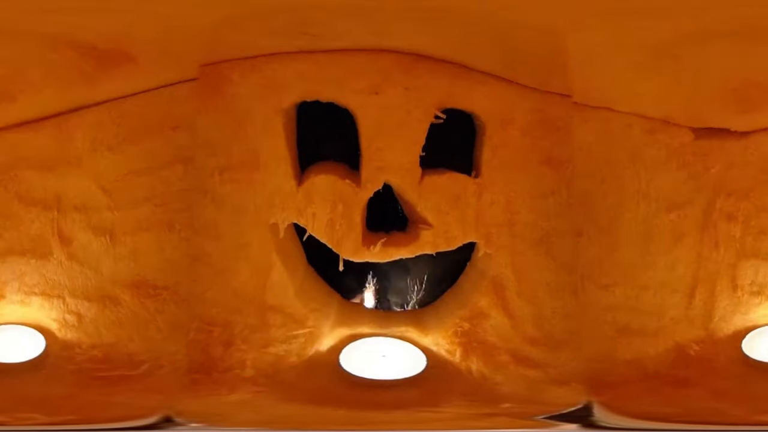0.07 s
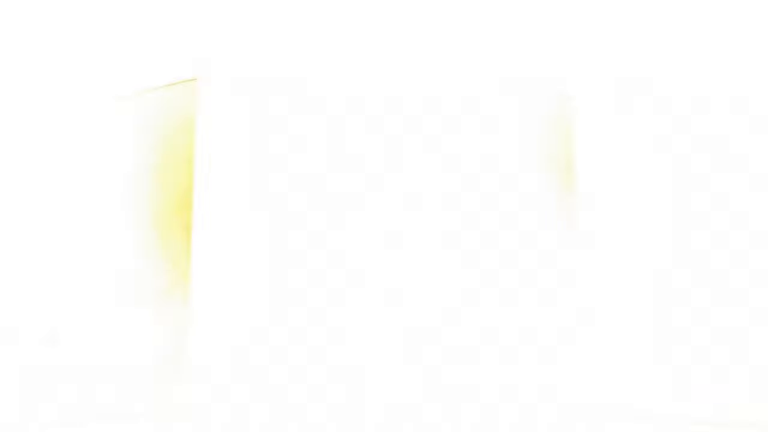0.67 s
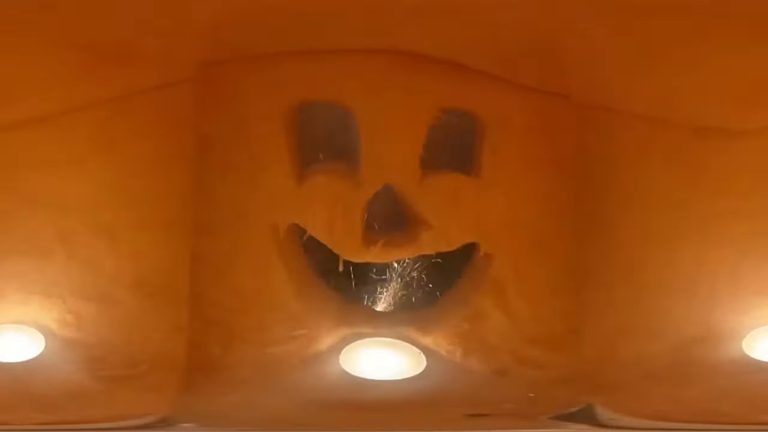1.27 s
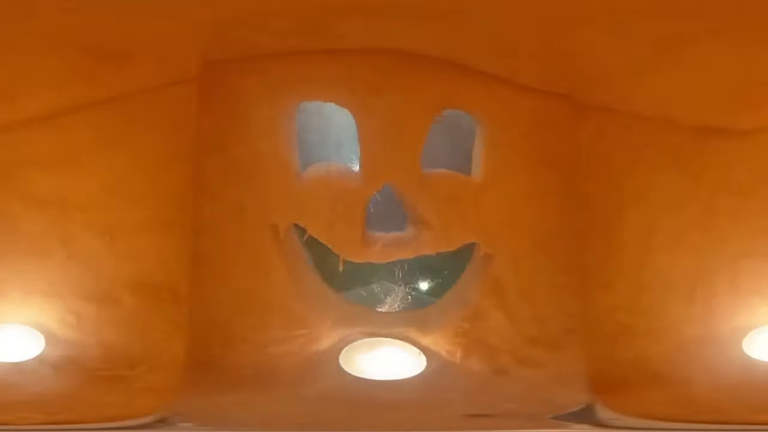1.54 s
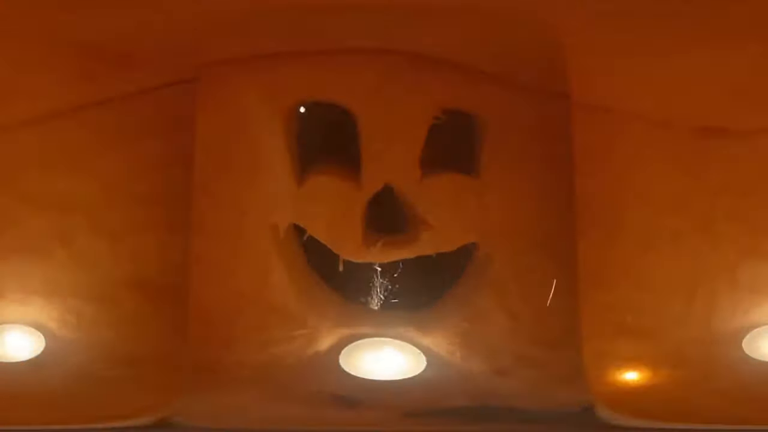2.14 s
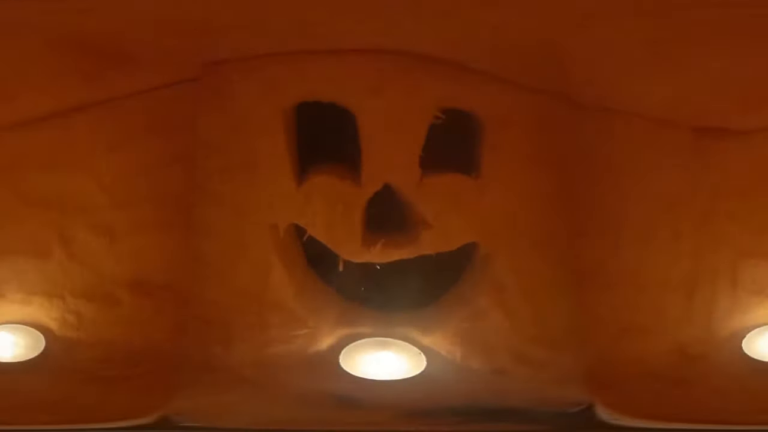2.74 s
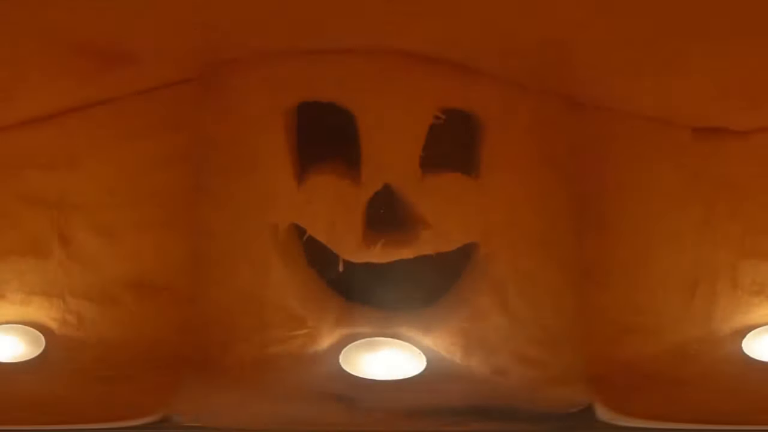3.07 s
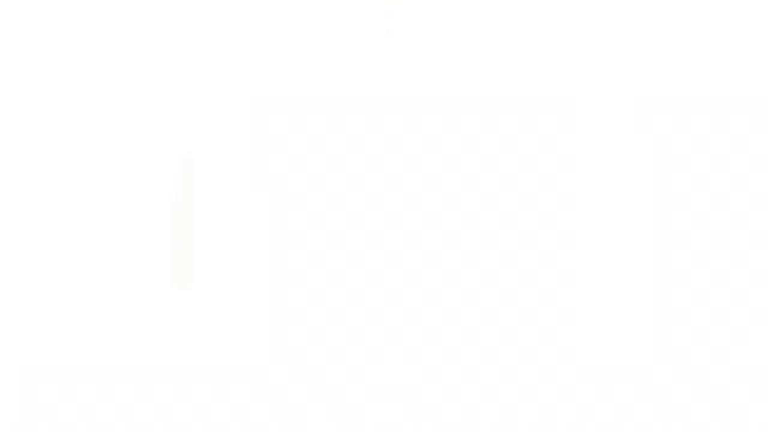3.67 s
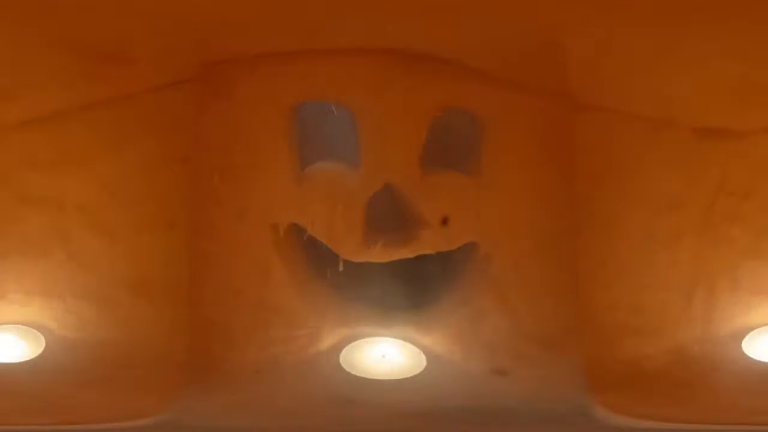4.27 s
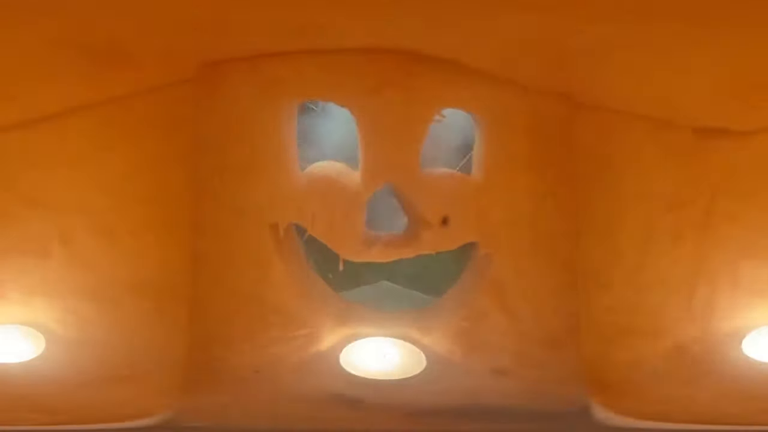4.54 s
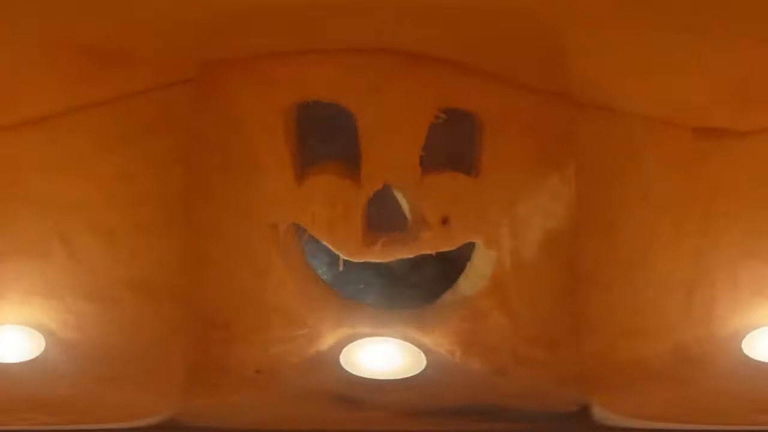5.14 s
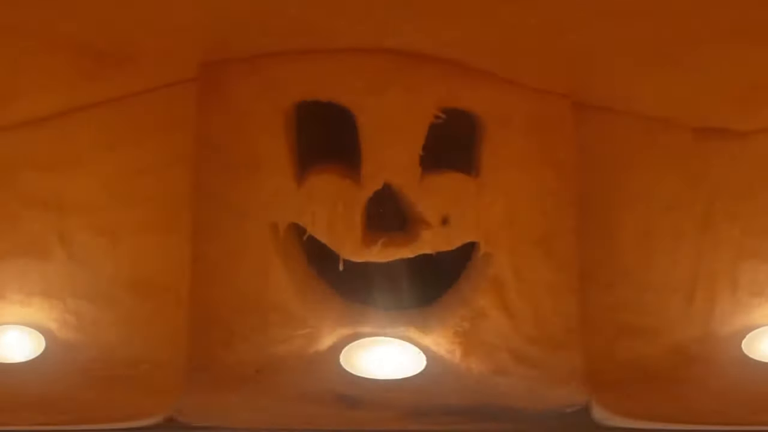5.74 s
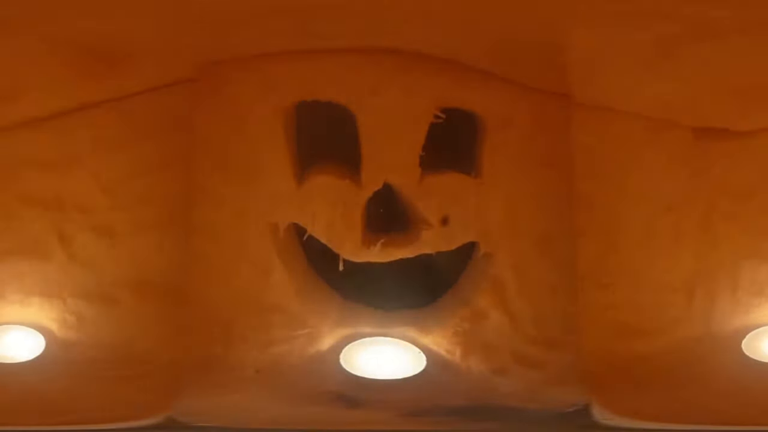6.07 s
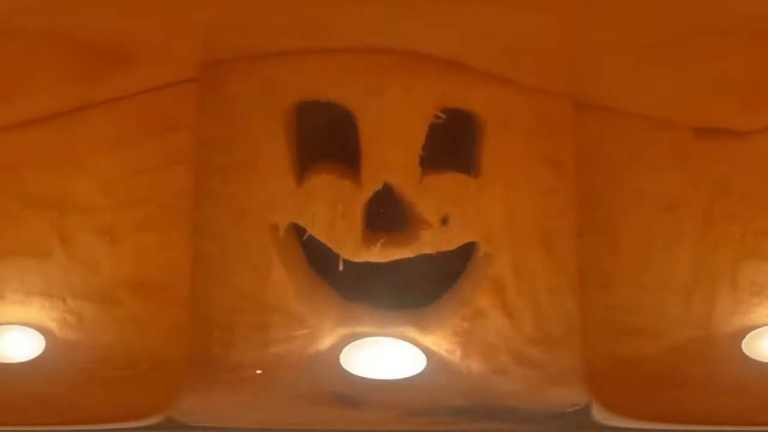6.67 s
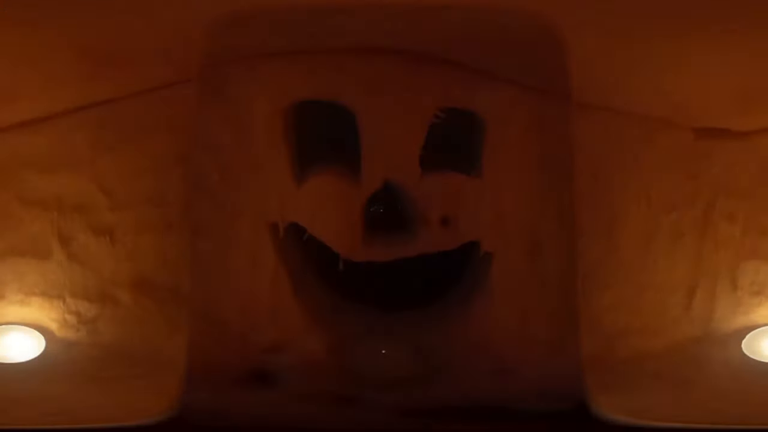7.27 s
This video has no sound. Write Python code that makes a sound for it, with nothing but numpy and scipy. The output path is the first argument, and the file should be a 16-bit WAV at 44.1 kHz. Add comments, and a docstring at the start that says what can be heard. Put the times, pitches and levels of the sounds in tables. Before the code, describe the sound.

Firecrackers go off in two rapid, crackling bursts with hollow thumps and faint fuse hiss, heard from inside a carved pumpkin.

```python
"""A faint fuse hisses, powder flares with a thump, and firecrackers go off at a hollow carved pumpkin.
Twice, single bangs thicken into a crackle and thin out again; fuses hiss between, and a last thump ends it.
Each bang is a sharp jump in air pressure that flutters between the pumpkin's walls, while flaring
powder makes the hollow ring like a bottle. The microphones sit inside, and loud bangs overload them."""
import sys
import numpy as np
from scipy import signal
from scipy.fft import rfft, irfft, next_fast_len
from scipy.io import wavfile
from scipy.ndimage import map_coordinates

SR = 44100
rng = np.random.default_rng(int(sys.argv[2]) if len(sys.argv) > 2 else 0)


def wav_out(sig):
    """Save sig, one row per channel (or a flat mono array), as 16-bit PCM at SR to the path in sys.argv[1]."""
    wavfile.write(sys.argv[1], SR, np.round(np.clip(np.atleast_2d(sig).T, -1, 1) * 32767).astype(np.int16))


N = 326781

# flaring powder: (time [s], push [dB], hollow's pitch [Hz], hollow's ring time [s], knock [dB],
# knock pitch [Hz], shell [dB], rush [dB], rush rise [s], rush fall [s])
# Ring, rise and fall times, and names with "t60", give the time for a change of 60 dB.
FLARES = [(.5130, -3, 284, 0.02, -1, 375, -9.5, -29.5, 0.034, 0.33),
          (0.5744, -3, 264, 0.013, -15, 440, -34, -13, 0.04, 0.03),
          (3.5457, -3, 253, 0.022, 1, 501, -9.5, -27, 0.057, 0.14),
          (3.5718, 3, 224, 0.02, 3, 720, -22, -4.5, 0.0053, 0.016),
          (1.8300, -9, 270, 0.061, -27, 495, -24.5, -46, .005, .05),
          (6.7114, -3.5, 268.7, 0.059, -36, 1115, -4.5, -50, 0.0026, 0.15)]


def bangs(flutter_db=-5, strong_db=-17.5, flutter_growth=0.68):
    """List the single bangs for pops(): loud bangs overload the microphones and ring on longer."""
    # bangs that stand out: (time [s], level [dB], bass [dB], treble [dB], pitch [Hz])
    single_bangs = [(0.6596, -34, 1.5, 16, 2408), (0.7526, -38.5, 5, -2, 978),
                    (0.811, -8.5, -0.5, -2.5, 1019), (.8243, -19.5, -9.5, -7.5, 1613),
                    (0.8547, -30.5, -2, 8, 749), (0.8949, -4.5, -7.5, -2, 1867),
                    (0.9194, -24, -3.5, 6.5, 2690), (0.9584, -20.5, -1.5, 3, 2813),
                    (0.9697, -6.5, -9, -4, 1855), (0.9803, -16.5, -3.5, 2, 1740),
                    (1.0175, -19, -4.5, 3.5, 3060), (1.0293, -17.5, -4, 2, 3075),
                    (1.0443, -20.5, -4, 8.5, 2914), (1.057, -24, -2.5, 4, 1507),
                    (1.0651, -6.5, -2.5, 2.5, 2980), (1.0692, -10.5, -3, 2.5, 1003),
                    (1.081, -14, 1.5, 3.5, 2100), (1.1042, -8.5, -2.5, 0, 2788),
                    (1.1299, -18.5, 2, 13.5, 1019), (1.1373, -18, 0.5, 9, 3002),
                    (1.1786, -18.5, -4, 6, 3118), (1.1922, -15.5, 0.5, 1, 800),
                    (1.2145, -14, 1.5, 8.5, 2397), (1.2347, -14, -4, 4, 786), (1.298, -12.5, -4, 10, 3207),
                    (1.3185, -12.5, -5, 11.5, 1440), (1.3838, -8.5, -0.5, 8, 3890),
                    (1.4023, -7.5, 2, 9, 4840), (1.4204, -11.5, 11.5, 2, 360), (1.4376, -8, 4.5, 6.5, 992),
                    (1.4605, -8.5, -5, 7, 1985), (1.4921, -12.5, 1, 4.5, 952), (1.51, -15.5, 3.5, 0.5, 817),
                    (1.5592, -4.5, 8, 4, 960), (1.5956, -8, -3, 7.5, 984), (1.6203, -7, 5.5, 4, 570),
                    (1.6659, -6.5, 2.5, 7, 1285), (1.705, -14.5, 7, 4.5, 372.7),
                    (1.745, -17.5, -1.5, 4, 1022), (1.7611, -10, 3.5, 10, 2540),
                    (1.7714, -10.5, 6.5, 6.5, 2740), (1.799, -12.5, -5.5, 6.5, 1004),
                    (1.8046, -11.5, 3.5, 9.5, 982), (1.8158, -9, -0.5, 4, 758),
                    (1.8276, -11, -1.5, 2.5, 710), (1.8449, -15.5, -0.5, 0.5, 1185),
                    (1.8790, -7, 5, 5.5, 2150), (1.8953, -19, -4, 0, 1953), (1.9235, -17, -0.5, 6.5, 1814),
                    (1.9383, -15, 3, 11, 1430), (1.976, -14, 2, 7, 366), (2.067, -16, 9, 15.5, 1773),
                    (2.08, -23, -7, 0, 2920), (2.0946, -13.5, 0, 4, 824), (2.1091, -25, -14, -10.5, 1740),
                    (2.1505, -21.5, -6, 6, 1073), (2.1629, -21.5, 4.5, -3.5, 734), (2.262, -13, -4, 2, 782),
                    (2.2777, -25, -9, 9.5, 1690), (2.8777, -18.5, 0, 1.5, 1160),
                    (3.7285, -7, -5, -0.5, 1588), (3.7745, -31, -8, -11, 1740), (3.8258, -27, -5, 4, 2000),
                    (3.8277, -8.5, -2, 5.5, 2797), (3.8712, -30.5, -1.5, -11.5, 986),
                    (3.9395, -32, -2, 5.5, 888), (3.9509, -7, 3, -6, 788), (3.9764, -26, 3, 11.5, 2280),
                    (4.047, -27, -7, 10, 957), (4.0593, -24.5, -3.5, 2.5, 3154), (4.07, -24, -4, 4.5, 940),
                    (4.106, -23.5, -5.5, 1, 966), (4.1193, -18.5, -2, 7, 710), (4.1317, -27.5, -5, 9, 950),
                    (4.1431, -6.5, 2, 2, 835), (4.1499, -7.5, -6, -3.5, 845), (4.1595, -21, -4, 3, 2405),
                    (4.1901, -17, -5.5, 11, 2902), (4.2044, -18, -2, 5.5, 788.5),
                    (4.2204, -22.5, 1.5, 7, 2900), (4.2262, -8.5, 7.5, 7.5, 3130),
                    (4.2526, -14, 0.5, 3, 790), (4.26, -10, -0.5, 2.5, 2678), (4.2842, -12, -5, 7.5, 1340),
                    (4.2949, -11.5, 4, 3.5, 370), (4.3453, -12.5, 6, 6, 2250), (4.3564, -8, 11, 8, 934),
                    (4.4046, -10.5, 4, -0.5, 687), (4.4332, -11, 2, 2.5, 4880),
                    (4.464, -3.5, 5.5, 7.5, 3146), (4.492, -6.5, 0, 5.5, 952), (4.5144, -12.5, -2, -4, 770),
                    (4.549, -5.5, 9.5, 2, 853), (4.5717, -14.5, -0.5, 6.5, 680),
                    (4.5844, -7.5, 7.5, 8, 1725), (4.6318, -16, 4.5, 4, 2500), (4.6463, -7, 7, 7, 970),
                    (4.669, -6.5, 9.5, 8, 970), (4.7104, -3, 12.5, 11, 765), (4.7239, -6, 6, 10, 380),
                    (4.7305, -8.5, 7, 10.5, 1220), (4.7489, -11.5, 4.5, 6, 370),
                    (4.7793, -15.5, 1, 6, 1960), (4.7953, -13.5, -0.5, 6, 2990),
                    (4.8365, -14, 5, 5.5, 2250), (4.8557, -25, 4, 8, 610), (4.8648, -13, -6, -6, 897),
                    (4.8886, -13.5, 3.5, 12, 1580), (5.1261, -14.5, 5.5, 2.5, 1270),
                    (5.3053, -20, -0.5, -6, 1195), (5.414, -18, 0.5, 3.5, 3700), (5.434, -23, 7, -5.5, 684)]
    when, db, bass_db, treble_db, hz = np.transpose(single_bangs)
    flutter = flutter_db + flutter_growth * np.maximum(db - strong_db, 0)
    return np.c_[when, db, bass_db, treble_db, flutter, hz]


def crackle(scatter_db=3.5, bass_scatter_db=3.0, treble_db=6.5, treble_scatter_db=2.5, flutter_db=-3.5,
            pitch_hz=1600, spread_octaves=.8, uneven=.7, count=220, edge_pace=.25, edge_drop_db=5.5):
    """A string of crackers catches: its pops come faster and louder, hold their pace, then thin out."""
    # burning strings: (start [s], full pace from [s], full pace until [s], end [s],
    # level at full pace [dB], full pace [pops/s])
    volleys = [(1.09, 1.39, 1.50, 1.80, -17, 310), (4.22, 4.41, 4.55, 4.77, -14, 260)]
    rows = []
    for first, full, ebb, last, db, rate in volleys:
        t = np.arange(first, last, 1 / SR)
        heat = np.interp(t, [first, full, ebb, last], [0, 1, 1, 0])
        burnt = np.cumsum(rate * (edge_pace + (1 - edge_pace) * heat)) / SR  # crackers spent so far
        turn = np.abs(np.arange(count) + uneven * rng.standard_normal(count))
        size, depth, sharpness, pitch = np.clip(rng.standard_normal((count, 4)).T, -2, 2)
        when = np.interp(turn, burnt, t)
        level = db - edge_drop_db * (1 - np.interp(when, t, heat)) + scatter_db * size
        # the pops grow deeper as the string burns down
        bass = np.interp(when, [first, last], [-3.5, 2]) + bass_scatter_db * depth
        treble = treble_db + treble_scatter_db * sharpness
        hz = pitch_hz * 2 ** (spread_octaves * pitch)
        volley = np.c_[when, level, bass, treble, np.full(count, flutter_db), hz]
        rows.append(volley[turn < burnt[-1]])
    return pops(np.vstack(rows))


def pops(rows, flutter_t60=0.014, lag_s=.00014, pan_db=2, pitch_db=4.0, pitch_octaves=0.21,
         trapped_db=-1.0, size=1024):
    """Each pop is a shock wave with its own pitch, followed by its flutter between the pumpkin's walls."""
    # tone of a blast: (frequency [Hz], level [dB])
    blast = [(40, -21), (100, -23), (200, 0), (350, 1.5), (800, 0.5), (1400, -1), (2100, -2.5),
             (3000, -2.5), (5000, -9), (7500, -12), (11000, -22), (16000, -38.5)]
    # tones of the pumpkin's hollow: (pitch [Hz], width [Hz], boost [dB])
    cavity = [(268, 170, 0), (980, 290, 3), (2700, 450, -0.5)]
    when, db, bass_db, treble_db, flutter_db, pitch_hz = np.transpose(rows)[:, :, None, None]
    t, hz = np.arange(size) / SR, np.fft.rfftfreq(size, 1 / SR)
    lead = 16 / SR  # a little space ahead of the shock
    sides = np.array([[1], [-1]])
    lag, pan = rng.standard_normal((len(rows), 2)).T[:, :, None, None]
    # the crackers lie all about, so each shock meets the two microphones at different moments
    shock = np.exp(-2j * np.pi * hz * (lead + sides * lag_s / 2 * np.clip(lag, -2, 2)))
    fade = amp(-60 * t / flutter_t60) * np.clip((t - lead) / 0.00033, 0, 1)
    flutter = rfft(paired(rng.standard_normal((len(rows), 2, size))) * fade / np.linalg.norm(fade))
    hollow_db = sum(gain / (1 + (2 * (hz - f) / width) ** 2) for f, width, gain in cavity)
    tilt_db = bass_db / (1 + (hz / 600) ** 3) + treble_db * (1 - 1 / (1 + (hz / 3400) ** 3))
    peak_db = pitch_db / (1 + (np.log2((hz + 1) / pitch_hz) / pitch_octaves) ** 2)
    colour = causal(along(blast, hz) + hollow_db + tilt_db + peak_db)
    waves = irfft((shock + amp(flutter_db + trapped_db) * flutter) * colour)
    strength = np.sqrt(np.mean(waves[..., :SR // 250] ** 2, axis=(1, 2), keepdims=True))  # first 4 ms
    out = np.zeros((2, N))
    for start, wave in zip(when.ravel(), waves / strength * amp(db + sides * pan_db * pan)):
        add(out, start - lead, wave)
    return out


def flares(knock_t60=.013, crack_db=-13, crack_t60=.025, hiss_db=-47, hiss_t60=0.52):
    """Powder catches with a swelling rush, its push rings the hollow like a bottle, and sparks hiss away."""
    # tone of the flame: (frequency [Hz], level [dB])
    flame_tone = [(60, -24.5), (120, -18), (230, 7), (500, 6.5), (1100, -3), (2500, -8), (6000, -16),
                  (15000, -38.5)]
    # the pumpkin's higher notes: (pitch [Hz], level [dB], ring time [s])
    shell_notes = [(1084, 1.5, 0.014), (1488, -5.5, 0.025), (2256, 2, 0.011), (3300, -10, 0.02),
                   (3700, -22.5, 0.02), (7010, -23.5, .016)]
    out, flame = np.zeros((2, N)), noise(flame_tone)
    sizzle = noise([(500, -13.5), (2500, 1.0), (7000, -2.0), (11000, -8.5), (16000, -17.5)])
    crack = noise([(500, -53), (1500, 10), (4000, 7.5), (8000, -5.5), (15000, -19.0)])
    for when, push_db, hz, t60, knock_db, knock_hz, shell_db, rush_db, rise, fall in FLARES:
        span = slice(max(round(when * SR) - SR // 4, 0), round(when * SR) + SR // 2)
        t = np.arange(N)[span] / SR - when
        after, before = np.maximum(t, 0), np.maximum(-t, 0)
        thump = amp(push_db) * ring(after, hz, t60, attack=0.0011)
        knock = amp(knock_db) * ring(after, knock_hz, knock_t60, attack=0.001)
        shell = sum(amp(db + rng.normal(0, 1.3, (2, 1))) * ring(after, f, life)
                    for f, db, life in shell_notes)
        snap = amp(crack_db - 60 * after / crack_t60) * (t > 0) * crack[:, span]
        rush = amp(rush_db - 60 * (before / rise + after / fall)) * flame[:, span]
        spray = np.sqrt(rise / 0.043)  # the longer the powder takes to catch, the more sparks it throws
        hiss = amp(hiss_db - 60 * (before / rise + after / hiss_t60)) * spray * sizzle[:, span]
        out[:, span] += thump + knock + amp(shell_db) * (shell + snap) + rush + hiss
    return out


def sparks():
    """The fuse spits a few sparks, each a tiny pop."""
    # sparks: (time [s], level [dB], bass [dB], treble [dB], flutter [dB], pitch [Hz])
    spits = [(3.501, -46.5, -4, -4, -1, 4040), (5.862, -51.5, -10, -5, 0, 4990),
             (6.183, -65, -12, 26, 10.5, 6960), (6.313, -66, -10, 16, -3, 7080),
             (6.379, -66, -11, 16, -6, 6000), (6.772, -47.5, -9, 15, -5, 6030)]
    return pops(spits)


def fuse(ember_db=-73.5, fizz_steeper=1.4, waver_db=0.33, sputter_db=2.0):
    """Each fuse swells and fades with a soft rush; its sputtering fizz comes and goes more steeply."""
    # fuses and embers flaring up: (peak time [s], rush [dB], fizz [dB], rush rise [s], rush fall [s])
    burns = [(.48, -81.5, -72, 9, .3), (2.32, -64.5, -64, 0.22, 2), (2.852, -53.5, -68, 3.4, 0.29),
             (3.42, -55, -73, 2.4, 1.0), (3.72, -65, -66, .25, 0.046), (5.11, -58, -67.5, 1.6, 0.18),
             (5.2, -61, -62, 0.17, 3), (5.5, -59, -65, .3, .8), (5.88, -52, -76, 1.2, 7),
             (5.9, -57, -62, .15, 0.74), (7.05, -64.5, -85.5, 1.5, 4)]
    # tone of the breathy rush: (frequency [Hz], level [dB])
    rush_tone = [(150, -26.5), (300, -5.5), (700, -2.5), (1400, -1), (2300, -5.5), (3200, -11),
                 (4500, -20.5), (7000, -37.5), (12000, -61)]
    # tone of the bright fizz: (frequency [Hz], level [dB])
    fizz_tone = [(1500, -21.5), (3000, 6), (4500, 4.5), (6500, -1), (9000, -17), (12000, -25.5),
                 (16000, -36.5)]
    t = np.arange(N) / SR
    rush, fizz = amp(ember_db), 0  # a little rush never dies away
    snuffed = FLARES[-1][0]  # the last flare blows out the rush of the earlier fuses
    for peak, rush_db, fizz_db, rise, fall in burns:
        burn_db = -60 * np.maximum((peak - t) / rise, (t - peak) / fall)
        alight = (t < snuffed) | (peak > snuffed)
        rush = np.hypot(rush, alight * amp(rush_db + burn_db))
        fizz = np.hypot(fizz, amp(fizz_db + fizz_steeper * burn_db))
    breath = rush * amp(waver_db * wobble(12)) * noise(rush_tone)
    sputter = fizz * amp(sputter_db * wobble(140)) * noise(fizz_tone)
    return breath + sputter


def near_echoes(x, tail_db=-15, stretches=16):
    """Nearby surfaces answer, then a short tail follows; the paths change as the crackers jump about."""
    # echoes off nearby surfaces: (delay [s], level [dB])
    walls = [(.0098, -22.5), (0.013, -18.5), (0.018, -24), (.0245, -36), (.045, -31.5)]
    # how long the tail lasts: (frequency [Hz], ring time [s])
    ring_times = [(150, 0.19), (600, 0.25), (2500, 0.19), (7000, 0.14), (14000, 0.029)]
    tail_tone = [(100, 0), (400, -9), (1500, -6), (6000, -4.5), (14000, 4.0)]
    out = np.zeros((2, N))
    edges = np.linspace(0, N, stretches + 1).astype(int)
    for start, end in zip(edges, edges[1:]):
        hz, t, bands = signal.stft(paired(rng.standard_normal((2, SR // 3))), SR, nperseg=256)
        fade = amp(-60 * t / along(ring_times, hz)[:, None]) * np.clip(t / 0.0058, 0, 1)
        tail = signal.istft(bands * fade, SR, nperseg=256)[1]
        tail = amp(tail_db) * filtered(tail / np.linalg.norm(tail[0]), lambda f: amp(along(tail_tone, f)))
        for delay, db in walls:
            when = delay * (1 + 0.056 * rng.standard_normal()) + .0001 * rng.standard_normal(2)
            tail[[0, 1], np.round(when * SR).astype(int)] += amp(db)
        add(out, start / SR, signal.fftconvolve(x[:, start:end], tail, axes=1))
    return out


def far_echo(x, level_db=-35, t60=2.2):
    """Distant surroundings return a faint, dull wash."""
    t = np.arange(2 * SR) / SR
    wash = noise([(100, -13.5), (400, -4), (1500, 6), (4000, 0.5), (8000, -9.0), (14000, -21.5)])
    tail = wash[:, :len(t)] * amp(-60 * t / t60) * np.clip(t / .03, 0, 1)
    return amp(level_db) * signal.fftconvolve(x, tail / np.linalg.norm(tail[0]), axes=1)[:, :N]


def air(level_db=-61.5):
    """A low, steady hush lies under everything."""
    # tone of the quiet background: (frequency [Hz], level [dB])
    air_tone = [(24, -74), (40, -50), (101, -14.5), (251, -1.5), (297, -5), (368, -6.5), (552, -13.5),
                (753, -8), (2150, -26.5), (4000, -37), (4730, -38), (5460, -42), (6930, -41),
                (12000, -47.5), (15600, -71.5), (22000, -120)]
    return amp(level_db) * noise(air_tone)


def ring(t, hz, t60, attack=0.00009):
    """A note struck at t = 0; the air pressure follows how fast its swing changes."""
    swing = np.sin(2 * np.pi * hz * t) * amp(-60 * t / t60) * (1 - np.exp(-t / attack))
    return -np.gradient(swing) * SR / (2 * np.pi * hz)


def noise(tone):
    """Stereo noise of strength 1, shaped by rows of (frequency [Hz], level [dB])."""
    # how alike left and right are in steady noise: (frequency [Hz], likeness [0 to 1])
    alike = [(100, 0.95), (450, 1), (1400, 0.65), (3000, 0.14), (8000, .15)]
    mid, side = filtered(rng.standard_normal((2, N)), lambda hz: amp(along(tone, hz)) * spread(hz, alike))
    stereo = np.array([mid + side, mid - side])
    return stereo / np.sqrt(np.mean(stereo ** 2) + 1e-20)


def paired(x):
    """Two unrelated signals become sound from all around: alike in the bass, apart in the treble."""
    # how alike left and right are in bouncing sound: (frequency [Hz], rough likeness [0 to 1])
    alike = [(100, 0.83), (600, 1), (1400, 0.96), (3000, 0.51), (8000, 0.03)]
    return np.array([[1, 1], [1, -1.7]]) @ filtered(x, lambda hz: spread(hz, alike))


def spread(hz, alike):
    """Gains for the part left and right share (mid) and the part where they are opposite (side)."""
    turn = np.arccos(np.clip(along(alike, hz), -1, 1)) / 2
    return np.array([np.cos(turn), np.sin(turn)])


def from_right(x, lag_s):
    """A source off to the right reaches the left microphone later."""
    return filtered(x, lambda hz: np.exp(-1j * np.pi * hz * lag_s * np.array([[1], [-1]])))


def amp(db):
    """Turn decibels into a gain."""
    return 10 ** (np.asarray(db) / 20)


def along(points, hz):
    """Read between (frequency [Hz], value) points, with octaves evenly spaced."""
    f, v = np.transpose(points)
    return np.interp(np.log(hz + 1), np.log(f + 1), v)


def wobble(rate):
    """A smooth curve through `rate` random points a second."""
    return map_coordinates(rng.standard_normal(int(N * rate / SR) + 4), [np.arange(N) * rate / SR])


def filtered(x, response):
    """Scale each frequency in x by response(frequency)."""
    n = x.shape[-1]
    padded = next_fast_len(n + min(n // 2, 4096), True)
    return irfft(rfft(x, padded) * response(np.fft.rfftfreq(padded, 1 / SR)), padded)[..., :n]


def causal(db):
    """A filter with these gains that rings only after it is struck (minimum phase)."""
    cepstrum = irfft(np.log(amp(db)))
    half = cepstrum.shape[-1] // 2
    return np.exp(rfft(cepstrum * np.r_[1, np.full(half - 1, 2), 1, np.zeros(half - 1)]))


def add(out, start_s, sound):
    """Mix a sound in at its start time."""
    i = max(round(start_s * SR), 0)
    out[:, i:i + sound.shape[-1]] += sound[:, :max(N - i, 0)]


def scene():
    """Bangs, crackle and flares with their echoes, over the fuses and the quiet air."""
    background = from_right(fuse(), lag_s=.00019) + air()
    singles, thumps = bangs(), from_right(flares(), lag_s=.00015)
    inside = pops(singles) + sparks() + thumps
    # the surroundings get the shocks with little of their pitch or flutter
    outside = pops(singles, pitch_db=-1.5, trapped_db=-20)
    volleys = crackle()
    echoes = near_echoes(outside + volleys + amp(-7.0) * thumps) + far_echo(outside + volleys)
    return inside + volleys + echoes + background


def record(dry, ceiling=0.83, hardness=6.3, low_cut_hz=150, top_hz=16100):
    """The microphones overload on big bangs; the camera thins the rumble and cuts the highest treble."""
    squashed = dry / (1 + np.abs(dry / ceiling) ** hardness) ** (1 / hardness)
    thinned = signal.sosfilt(signal.butter(1, low_cut_hz, "highpass", fs=SR, output="sos"), squashed)
    return filtered(thinned, lambda hz: 1 / (1 + (hz / top_hz) ** 90))


dry = scene()
out = record(dry)
wav_out(out)
```